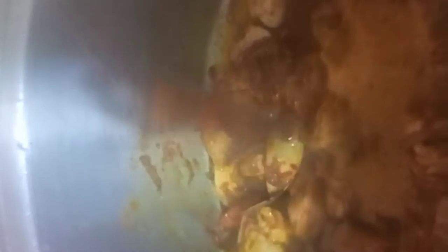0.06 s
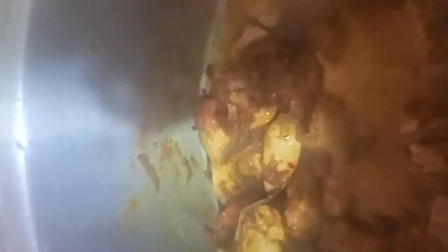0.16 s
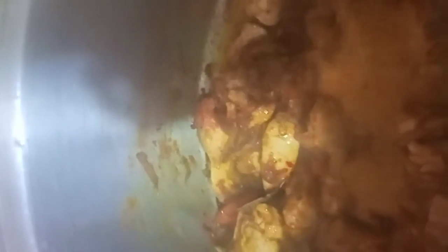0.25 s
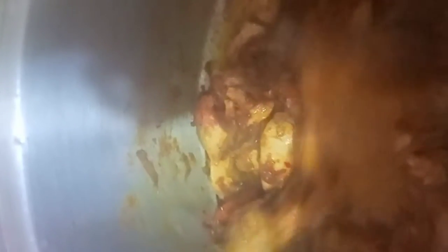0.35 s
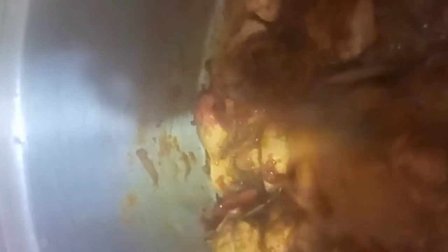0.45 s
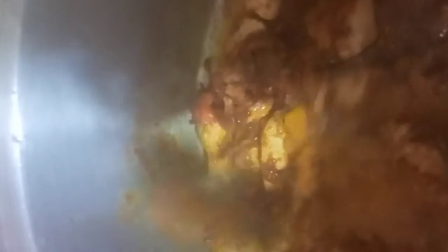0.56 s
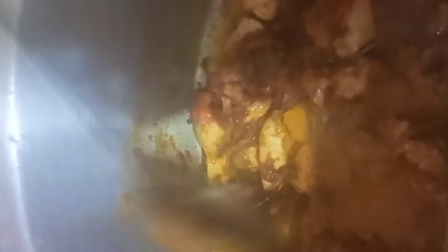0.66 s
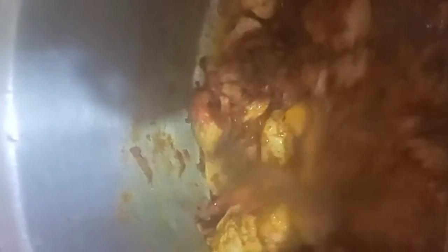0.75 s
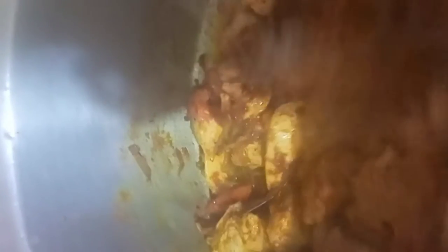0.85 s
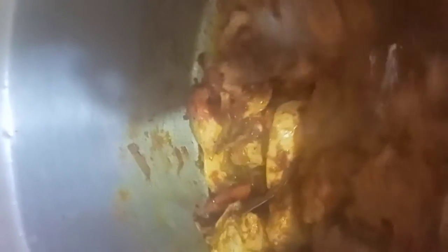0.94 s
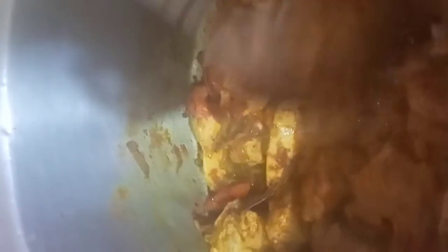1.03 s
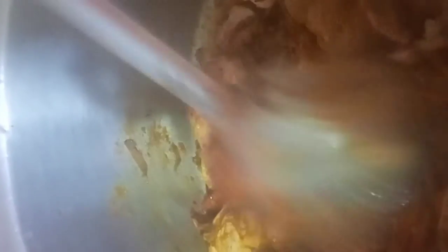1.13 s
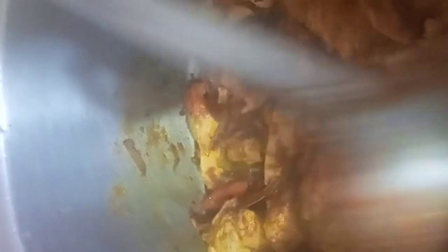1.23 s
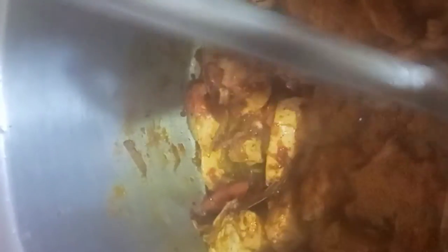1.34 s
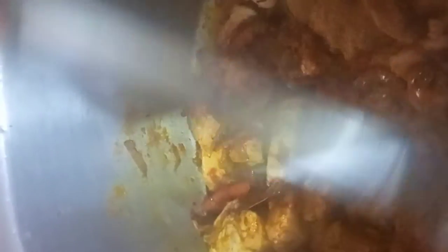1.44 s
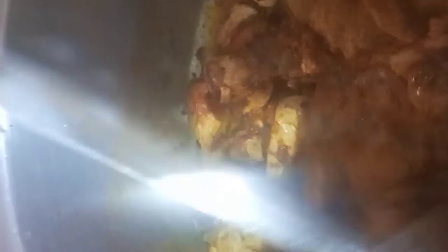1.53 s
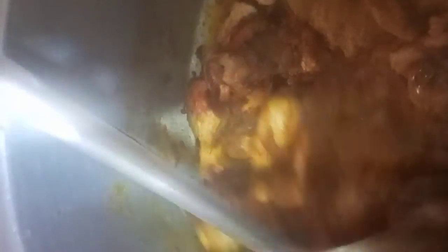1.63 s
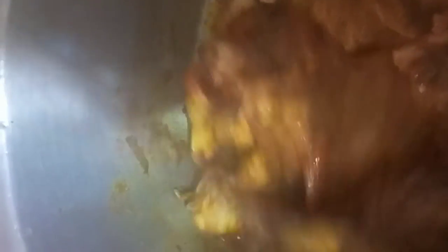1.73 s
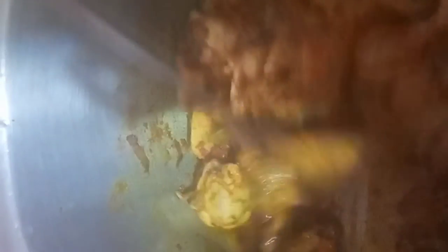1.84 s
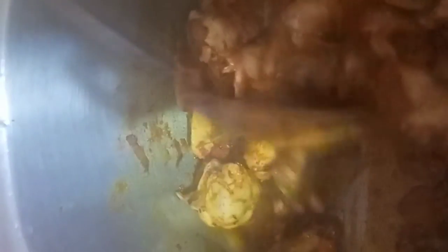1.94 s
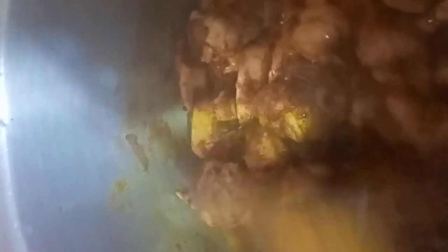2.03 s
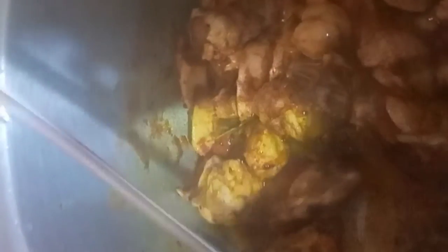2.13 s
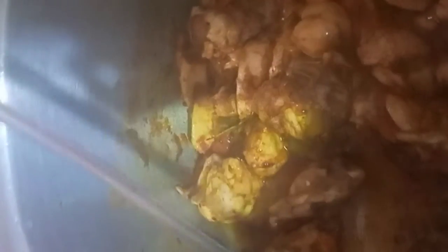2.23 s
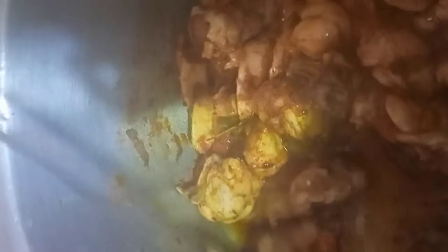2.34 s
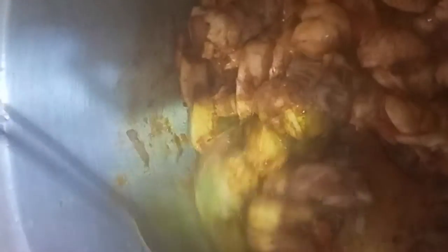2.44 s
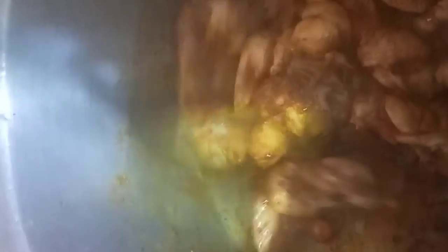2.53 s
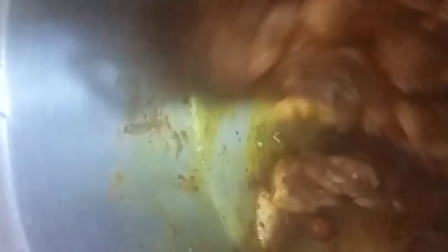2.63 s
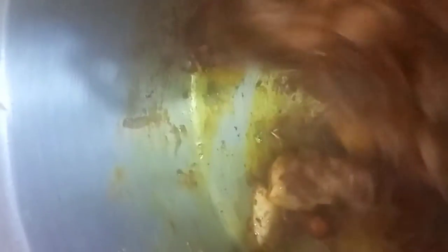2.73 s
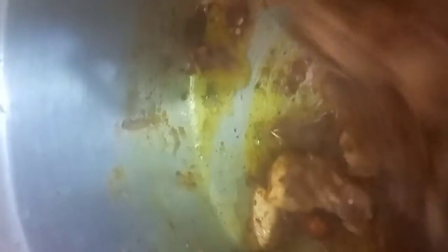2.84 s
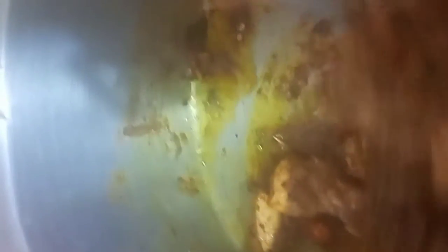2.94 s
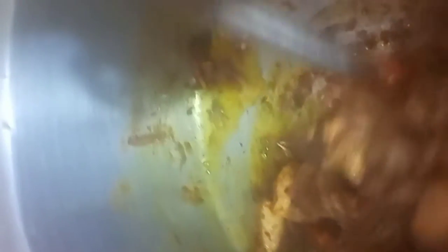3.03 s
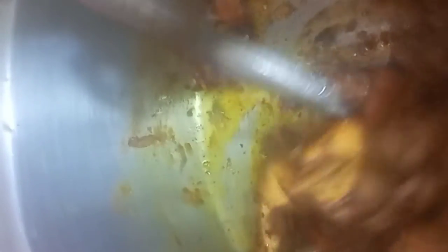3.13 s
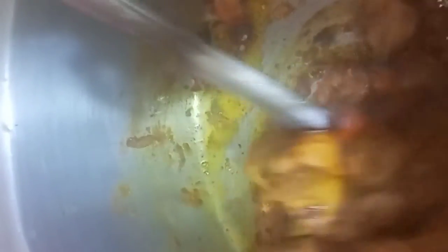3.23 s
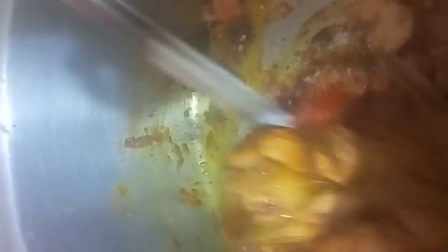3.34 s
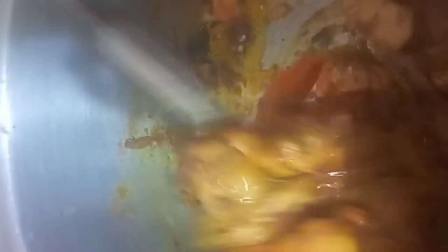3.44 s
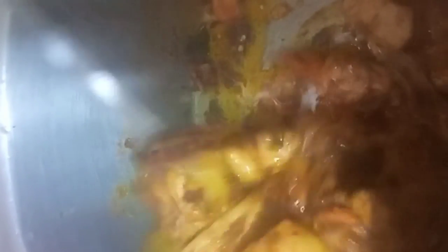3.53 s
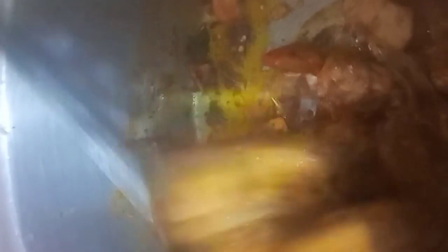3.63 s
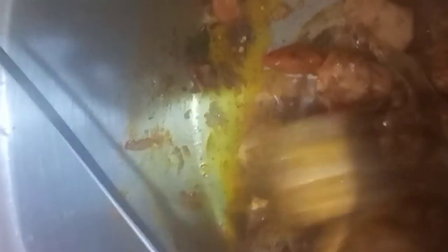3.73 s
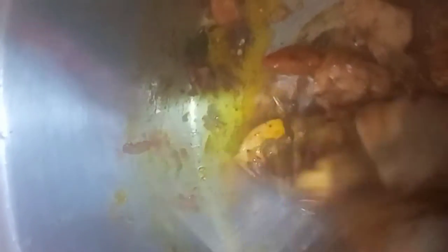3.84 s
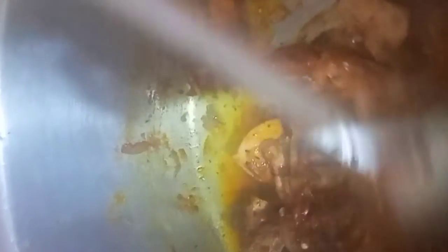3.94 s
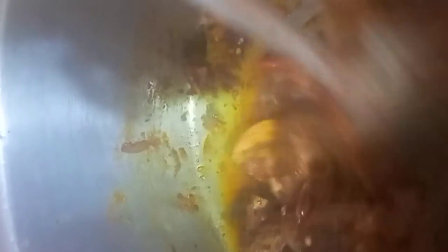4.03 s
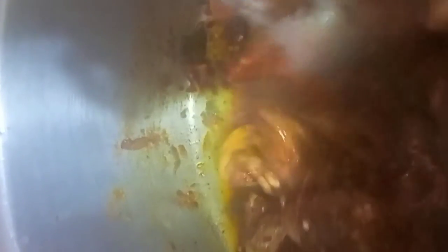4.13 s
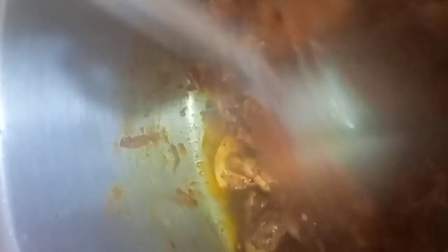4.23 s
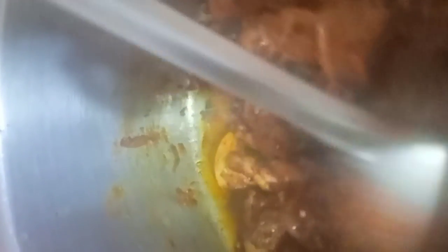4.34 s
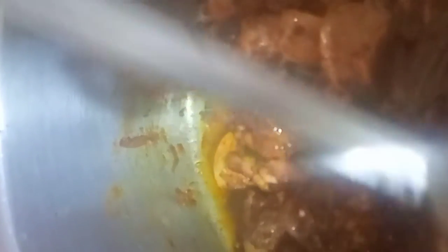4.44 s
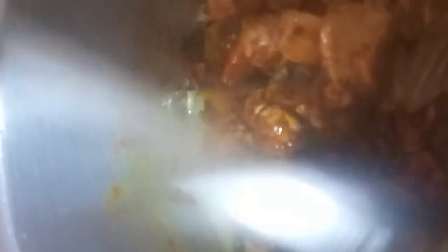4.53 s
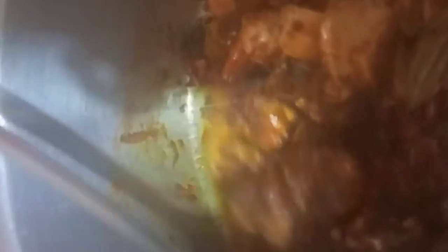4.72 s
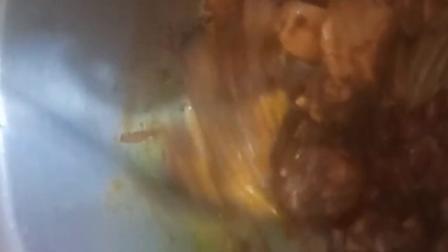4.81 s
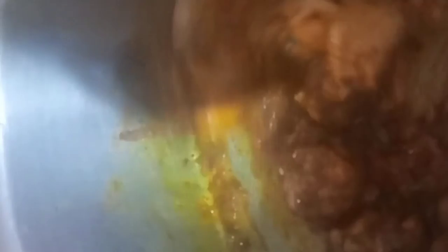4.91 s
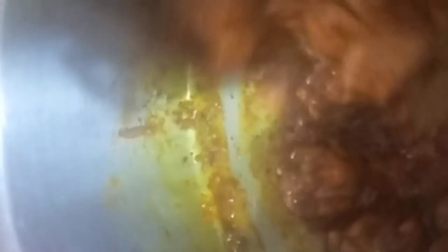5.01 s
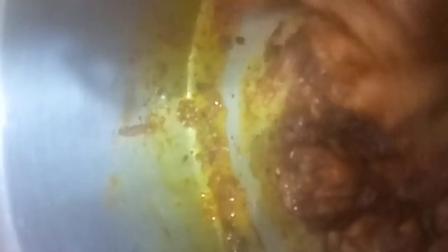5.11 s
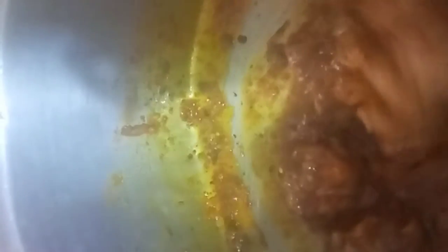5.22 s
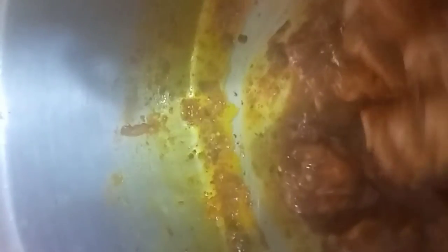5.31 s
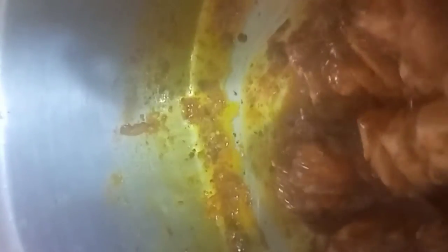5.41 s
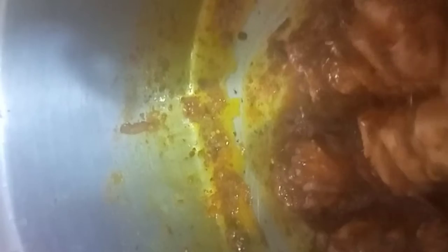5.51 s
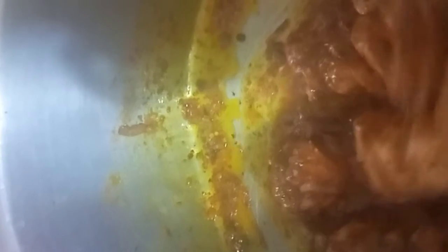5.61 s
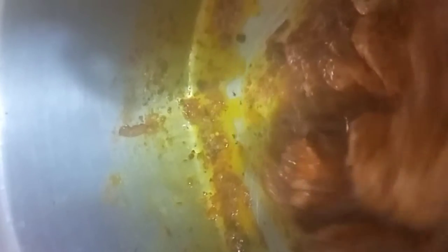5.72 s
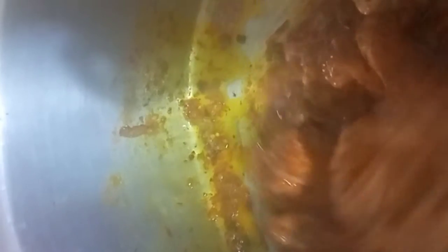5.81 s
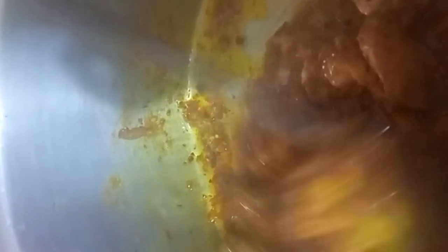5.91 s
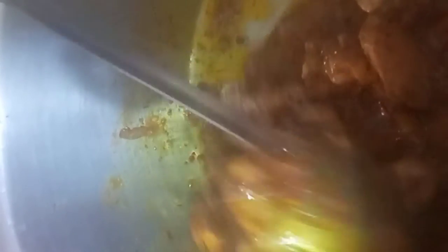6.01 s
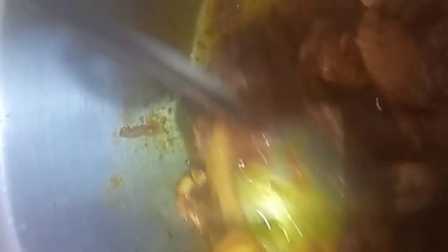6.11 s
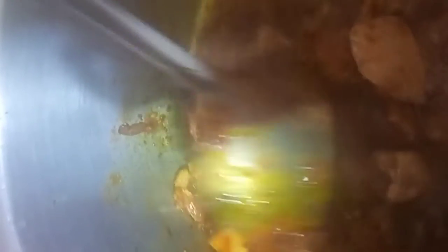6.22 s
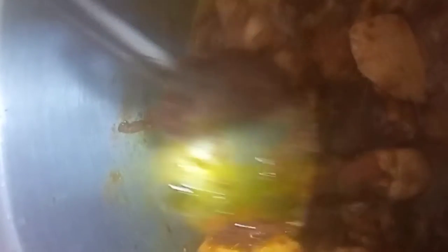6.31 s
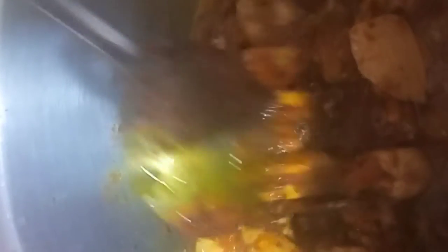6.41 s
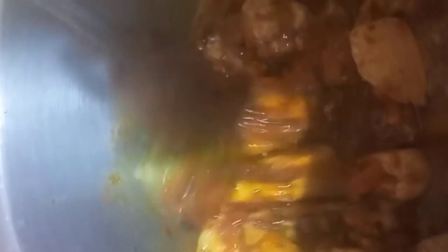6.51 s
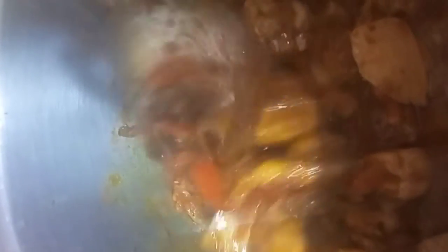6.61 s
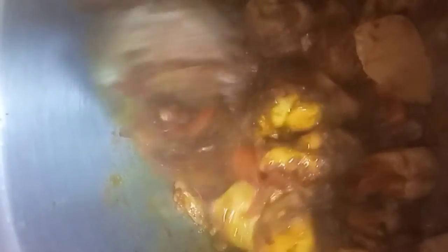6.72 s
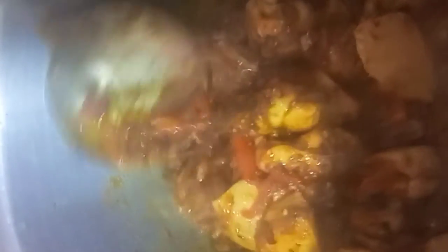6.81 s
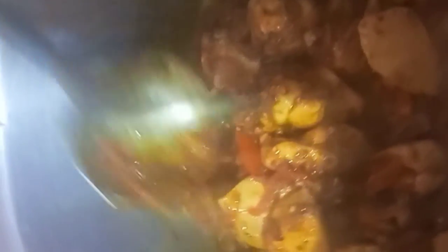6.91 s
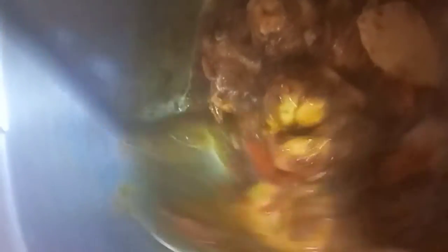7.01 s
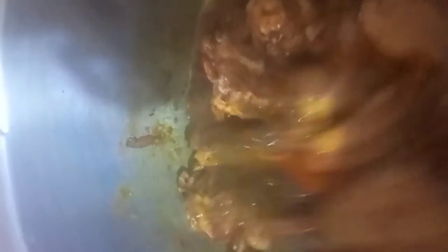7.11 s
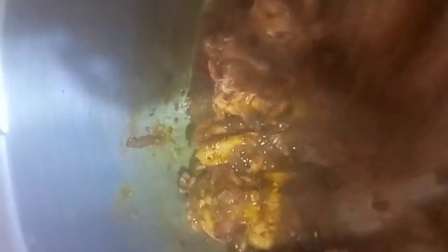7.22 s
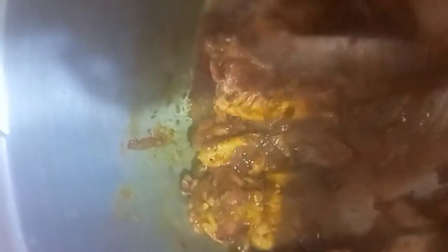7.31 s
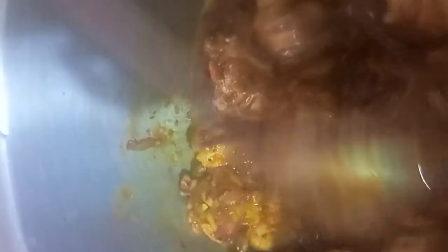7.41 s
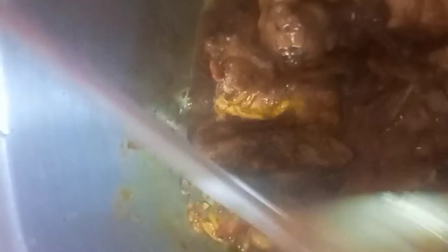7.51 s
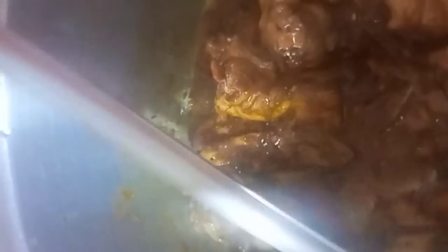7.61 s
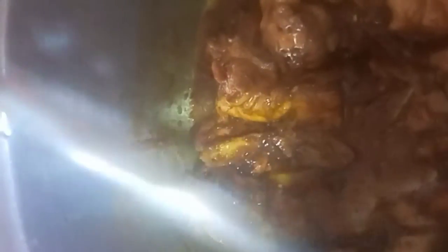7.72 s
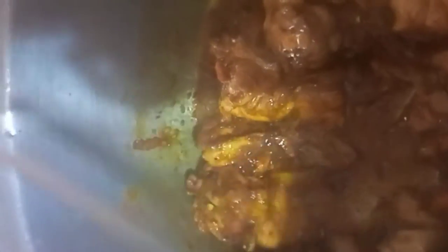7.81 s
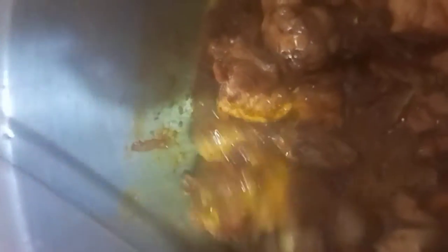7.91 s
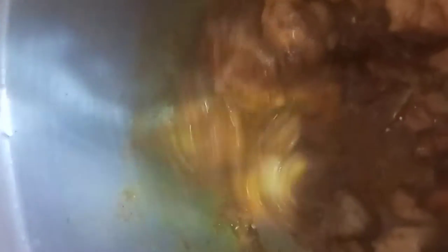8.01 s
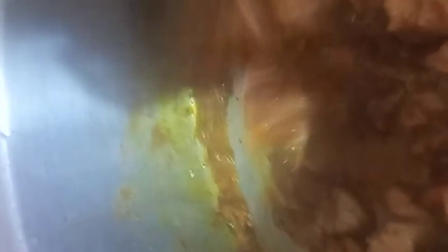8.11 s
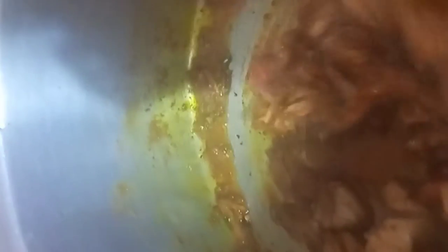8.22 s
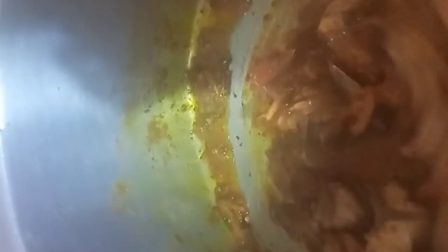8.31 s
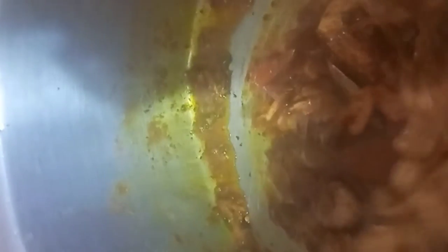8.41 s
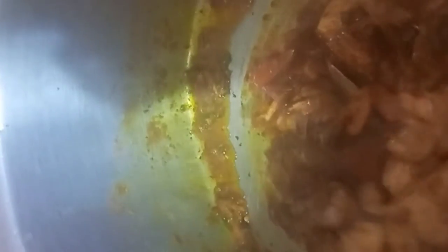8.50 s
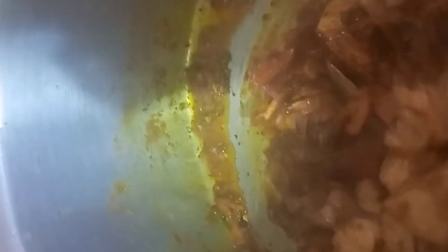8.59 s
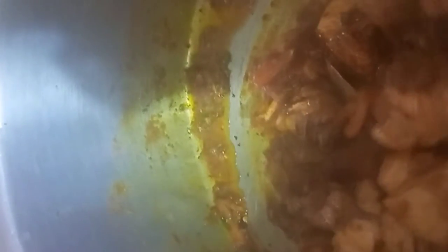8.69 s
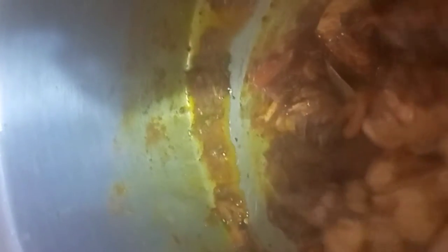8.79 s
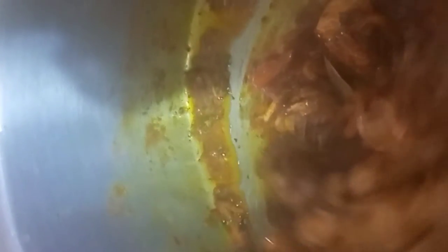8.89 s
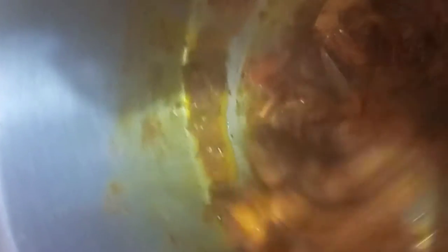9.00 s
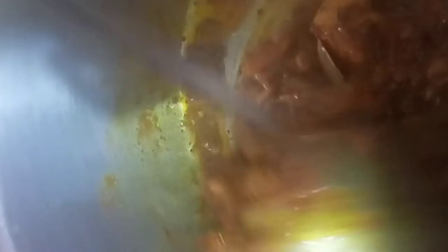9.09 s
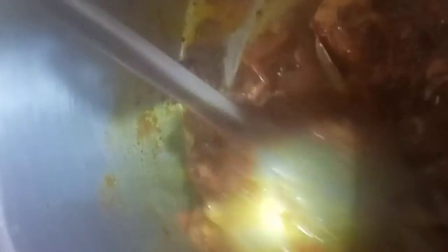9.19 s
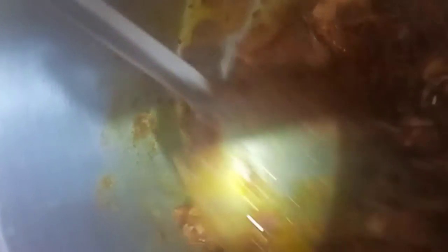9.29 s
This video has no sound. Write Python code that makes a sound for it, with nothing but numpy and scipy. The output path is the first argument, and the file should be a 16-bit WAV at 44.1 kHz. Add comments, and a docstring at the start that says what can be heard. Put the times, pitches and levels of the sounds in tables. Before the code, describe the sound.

Close to a metal pot in a small kitchen, a ladle taps the wall with a short bright clank, then stirs wet chicken in separate bursts: dull thumps, quickly damped clanks, gritty sticking scrapes and soft flops of meat. Sauce swishes between strokes, bubbles pop, and faint sizzling swells and settles. The last vigorous stroke gives way to quiet frying. Mono and dry, with a short room reflection.

```python
"""In a small kitchen, close by, a metal ladle stirs wet chicken in a metal pot.
Knocks are short pushes and rattles that sound the loaded bottom, the ringing wall and a bright edge.
Sticking, slipping strokes are bursts of clicks through resonances; meat shoves and flops, sauce swishes.
Between strokes dense clicks sizzle faintly, single bubbles pop as short rings with a splash of noise,
and filtered noise makes a faint low rumble."""
import sys
import numpy as np
from scipy import signal
from scipy.fft import rfft, irfft
from scipy.io import wavfile
from scipy.ndimage import uniform_filter1d

SR = 44100
rng = np.random.default_rng(int(sys.argv[2]) if len(sys.argv) > 2 else 0)


def master_out(mix):
    """Clip the mix to full scale and print it as 16-bit PCM to the path in sys.argv[1]."""
    frames = np.transpose(np.atleast_2d(mix))
    ceiling = np.clip(frames, -1, 1)
    pcm = np.round(ceiling * 32767).astype(np.int16)
    wavfile.write(sys.argv[1], SR, pcm)


N = 412335

# ladle blows, levels before the trims in knocks(): start_s, thud_db (loaded bottom), jolt_db (whole pot),
# clank_db (wall), edge_db (bright edge), ring_hz (strongest ring), rattle_t60_s
KNOCKS = [(0.2787, -35.5, -37.5, -17, -17.5, 2564, 0.093), (0.915, -30, -44, -24, -30, 1770, 0.022),
          (1.429, -31.5, -48.5, -39, -47, 1770, 0.038), (2.265, -21.5, -35.5, -26, -28, 1710, 0.02),
          (2.397, -27, -57, -57, -37, 1240, 0.06), (2.572, -71, -44, -37, -57, 2310, 0.025),
          (2.816, -58, -53, -33.5, -35, 1815, 0.033), (4.570, -23.5, -49, -26, -33.5, 1620, 0.16),
          (4.69, -67, -70, -36, -38.5, 2000, 0.026), (6.828, -36.5, -60.5, -18.5, -26.5, 1665, 0.025),
          (7.237, -46, -61, -30, -50, 1630, 0.033), (7.814, -20.5, -38, -20.5, -28, 1640, 0.049),
          (7.893, -35, -53, -28, -33, 2107, 0.03), (8.268, -37.5, -50.5, -36, -43, 1840, 0.054)]
# colour of the loaded bottom: freq_hz, relative_db
BOTTOM = [(40, -51.5), (95, -41), (135, -22.5), (205, -5.5), (240, -10.5), (275, -0.5), (335, 1.5),
          (400, -5.5), (470, -12), (570, -26.5), (780, -24), (1100, -42), (1800, -65)]
# colour of the pot rocking on its stand: freq_hz, relative_db
JOLT = [(30, -33.5), (70, -24), (110, -13), (150, 0), (195, 1.5), (240, -10.5), (400, -37), (800, -59)]
# colour of the wall's clank, before the shift by hardness: freq_hz, relative_db
CLANK = [(300, -38), (600, -12.5), (770, -2), (1000, -13), (1200, -0.5), (1400, -9), (1650, 5.5),
         (2100, -7), (2700, -13.5), (3300, -8), (4200, -19), (5500, -27.5), (9000, -58)]
# colour of the ladle's edge contact, also played by scraping(): freq_hz, relative_db
EDGE = [(2800, -42.5), (4300, -12.5), (4900, -7), (5500, -6), (6100, 5.5), (6550, -6), (7200, -10.5),
        (8500, -31.5), (10500, -29), (13000, -35.5), (14200, -25.5), (15200, -18.5), (16000, -20)]


def knocks():
    """Each blow thumps the bottom, jolts the pot and rattles on the wall, whose ring the food soon damps."""
    out = np.zeros(N)
    t = np.arange(SR // 2) / SR
    for start, thud_db, jolt_db, clank_db, edge_db, ring_hz, rattle_t60 in KNOCKS:
        rattle = rng.standard_normal((3, len(t))) * fade(t, rattle_t60) * onset(t, .0015)
        push = signal.unit_impulse(len(t))
        thud = kitchen(colour(push, BOTTOM), wet_db=-6)
        jolt = kitchen(colour(push, JOLT), wet_db=3.5)

        hardness = ring_hz / 1650  # a harder contact shifts the whole clank upward
        body = colour(rattle[0], np.multiply(CLANK, [hardness, 1]))
        strongest = band(ring(ring_hz, t60=.055), ring_hz / 2, ring_hz * 2)
        damped_wall = wall() * np.exp(-t / .045)
        modes = signal.oaconvolve(rattle[2], damped_wall)[:len(t)]
        modes = band(modes, low_hz=650, high_hz=7000)
        clank = unit_attack(body) + amp(-7) * unit_attack(strongest) + amp(-10) * unit_attack(modes)
        clank = kitchen(clank, wet_db=-4.5)
        edge = kitchen(colour(rattle[1], EDGE), wet_db=-8)

        levels_db = (thud_db, jolt_db, clank_db - 6.5, edge_db - 5)
        for part, db in zip((thud, jolt, clank, edge), levels_db):
            add(out, start, amp(db) * unit_attack(part))
    return out


# ringing modes of the pot wall: freq_hz, relative_db, t60_s
WALL = [(780, -14.5, 0.5), (894, -10.5, 0.18), (1160, 0.5, 0.25), (1596, 1, .2), (1655, -2, 0.083),
        (1950, -13, 0.25), (2050, -12.5, 0.9), (2138, -7, 0.16), (2295, -6.5, 0.08), (2564, -3.5, 0.078),
        (2580, -7.5, 0.073), (2960, -13.5, 0.1), (3920, -10.5, 0.36), (4380, -3, .19), (4760, -12, 0.38),
        (5500, -7, 0.23), (5717, -15, .19), (6110, -1.5, 0.098), (6170, -9.5, 0.26), (7100, -14, .22)]


def wall():
    """The wall's modes; their signs depend on the place of contact, drawn at random."""
    return sum(rng.choice([-1, 1]) * amp(db) * ring(hz, t60) for hz, db, t60 in WALL)


# colour of the ladle grinding on the wall: freq_hz, relative_db
GRIND = [(300, -41.5), (560, -18.5), (800, 1.5), (1000, -33), (1200, 8), (1420, -8.5), (1800, 11.5),
         (2150, -3.5), (2500, 6), (3000, -4.5), (3500, 1), (4200, -26), (5500, -16.5), (9000, -45)]
# colour of food dragged over the bottom, also played by flops(): freq_hz, relative_db
DRAG = [(50, -40.5), (110, -24), (170, -19.5), (230, -3), (275, -4.5), (335, 4.5), (410, -6), (490, -21.5),
        (600, -20), (900, -64)]


def scraping():
    """Stick and slip: bursts of tiny clicks drive wall, bottom and edge, and squeeze bubbles from the sauce."""
    friction, drag, edge, pitch = ladle_contact()
    judder = unit(amp(3 * wander(rate_hz=110)))
    slips = patchy(clicks(per_s=1800, spread_db=3) * judder, depth_db=3.5)

    rasp = unit(resonate(slips, pitch, width_hz=690))
    squelch = bubbles(per_s=320, low_hz=800.6, high_hz=4210, cycles=9.1, spread_db=4.0)
    wet = friction * (amp(-5.5) * rasp + amp(-13.5) * squelch)
    wet = band(wet, low_hz=666, high_hz=4600)
    modes = wall()
    ringing = signal.oaconvolve(slips * friction, modes / np.linalg.norm(modes))[:N]
    ringing = band(ringing, low_hz=606, high_hz=7160)
    grind = amp(-6) * colour(slips * friction, GRIND) + wet + amp(-18.0) * ringing

    chirps = bubbles(per_s=250, low_hz=5700, high_hz=6600, cycles=14, spread_db=4)
    chirps = band(chirps * edge, low_hz=4470, high_hz=7240)
    squeak = amp(-6) * colour(slips * edge, EDGE) + amp(-10) * chirps
    # pieces of meat bump along the bottom
    tumbling = patchy(clicks(per_s=420, spread_db=1.5), depth_db=5.0)
    return kitchen(grind + squeak + amp(-7) * colour(tumbling * drag, DRAG), wet_db=-9)


# ladle strokes along the wall: start_s, length_s, friction_db, edge_db, gain_db (force, start to end)
STROKES = [(1.475, 0.13, -55, -59.5, -24), (2.369, 0.097, -35.5, -37.5, 21.5),
           (2.544, 0.021, -33.5, -28, 1), (2.622, 0.11, -41, -45.5, -12.5), (2.77, .12, -41.5, -43.5, -1),
           (2.927, .025, -42, -49, -2.5), (2.972, 0.073, -55.5, -48, -5.5), (4.585, 0.047, -29, -30, -4),
           (4.702, 0.044, -47, -41.5, 6), (4.85, 0.17, -35, -35.5, -4.5), (5.115, 0.056, -28.5, -29, -14.5),
           (5.206, 0.13, -47.5, -49.5, -8), (5.389, 0.016, -52, -50, 1.5), (7.85, 0.069, -39.5, -43, -2.5),
           (7.977, 0.13, -36.5, -34, 10), (8.099, 0.13, -28, -25, 6.5), (8.236, .05, -43, -47, -11),
           (8.313, 0.11, -40, -42.5, -10)]
# the heap of chicken pushed across the bottom: start_s, length_s, drag_db
SHOVES = [(0.961, 0.03, -39), (1.466, 0.11, -65), (2.396, 0.24, -42), (2.768, 0.09, -41),
          (2.844, 0.1, -29.5), (4.607, 0.33, -40), (4.86, 0.46, -38), (5.28, 0.17, -59),
          (7.747, .03, -41.5), (7.872, 0.52, -35.5), (8.283, 0.122, -42.5)]
# short skids of the ladle, levels before SKID_DB: start_s, friction_db, drag_db, edge_db, pitch_hz, length_s
SKIDS = [(0.977, -31, -51, -38, 1800, 0.017), (1.311, -22, -42, -22.5, 2010, 0.021),
         (1.679, -35.5, -76, -49, 1720, 0.017), (2.81, -40.5, -29, -38, 1900, 0.015),
         (3.704, -45.5, -56, -35.5, 1920, 0.031), (3.779, -33.5, -35.5, -37, 1890, 0.029),
         (3.915, -40.5, -39.5, -46, 1620, 0.035), (4.425, -59.5, -76, -49, 2500, 0.066),
         (4.684, -20, -45, -24, 2004, 0.012), (7.232, -24, -54, -21, 1570, 0.032),
         (7.251, -29.5, -56, -22, 1700, 0.0081), (7.668, -40, -43, -36, 2400, 0.029),
         (7.708, -23, -36, -24, 1800, 0.029), (7.969, -25, -31, -19.5, 1900, 0.026),
         (8.03, -15, -39, -16, 2160, 0.009)]
# pressing harder raises the pitch of a stroke's scrape
SCRAPE_HZ, LIGHT_TOUCH_DB, SCRAPE_HZ_PER_DB = 1700, -45.5, 28.5
SHOVE_GAIN_DB = -1.5  # from start to end, as the heap spreads out
SKID_BITE_S, SKID_DB = 0.0087, -5


def ladle_contact():
    """How hard the ladle rubs the wall, drags food and digs in its edge, and the pitch of the scrape."""
    friction, drag, edge, pitch = np.zeros((4, N))
    for start, length, friction_db, edge_db, gain_db in STROKES:
        force = stroke(length, gain_db)
        rub = amp(friction_db) * force
        pressure_db = np.maximum(20 * np.log10(rub + 1e-12) - LIGHT_TOUCH_DB, 0)
        add(friction, start, rub)
        add(edge, start, amp(edge_db) * force)
        add(pitch, start, rub * (SCRAPE_HZ + SCRAPE_HZ_PER_DB * pressure_db))
    for start, length, db in SHOVES:
        add(drag, start, amp(db) * stroke(length, SHOVE_GAIN_DB))
    t = np.arange(SR // 4) / SR
    for start, *levels_db, hz, length in SKIDS:
        # bites quickly, then lets go
        skid = amp(SKID_DB) * onset(t, SKID_BITE_S) * np.exp(-(t / length) ** 2)
        for track, db in zip((friction, drag, edge), levels_db):
            add(track, start, amp(db) * skid)
        add(pitch, start, amp(levels_db[0]) * skid * hz)
    # mean pitch weighted by friction, so the stronger contact dominates
    return friction, drag, edge, pitch / (friction + 1e-12)


BITE_S, RELEASE_T60_S = .011, 0.11  # every stroke grips quickly and dies away when the ladle lifts


def stroke(length, gain_db):
    """Force of one push: it grips, grows or slackens steadily, and is released."""
    t = np.arange(int((length + .3) * SR)) / SR
    held_db = gain_db * (np.minimum(t / length, 1) - .5)
    release = fade(np.maximum(t - length, 0), RELEASE_T60_S)
    return onset(t, BITE_S) * amp(held_db) * release


# single pieces tumble off the heap and land: start_s, level_db
FLOPS = [(2.525, -42.5), (2.588, -45), (2.93, -38.5), (4.94, -39), (5.077, -50), (5.23, -41.5), (7.97, -36),
         (8.186, -38.5), (8.35, -45.5), (8.82, -70), (9.06, -74)]


def flops():
    """A piece of meat lands with a soft bump on the loaded bottom."""
    out = np.zeros(N)
    for start, db in FLOPS:
        bump = kitchen(colour(signal.unit_impulse(SR // 2), DRAG), wet_db=-5.5)
        add(out, start, amp(db) * unit_attack(bump))
    return out


# the ladle's back slides through sauce: middle_s, level_db, centre_hz (geometric), width_hz,
# half_length_s (from the middle to 1/e)
SLIDES = [(.505, -51.5, 6000, 2370, .04), (0.623, -42, 3020, 3670, 0.069), (0.69, -49, 1840, 1170, 0.066),
          (1.564, -43.5, 6000, 880, 0.015), (1.7, -37.5, 6220, 1150, 0.009), (3.083, -45, 1820, 580, 0.044),
          (3.064, -57, 6380, 700, 0.22), (5.83, -74.5, 2800, 3040, 0.19), (6.97, -64, 2750, 3500, 0.095),
          (7.156, -59, 1780, 2320, 0.16), (7.304, -58, 1790, 2000, 0.036), (8.206, -35, 3280, 2630, 0.051)]


def slides():
    """Light, well-wetted contact gives a soft swish that swells and fades."""
    out = np.zeros(N)
    t = np.arange(N) / SR
    # the film of sauce tears in tiny bursts
    film = patchy(clicks(per_s=3300, spread_db=-2.0), depth_db=2.5)
    for middle, db, hz, width_hz, half_length in SLIDES:
        low_hz = np.hypot(hz, width_hz / 2) - width_hz / 2
        swish = unit(band(film, low_hz, low_hz + width_hz))
        out += amp(db) * swish * np.exp(-((t - middle) / half_length) ** 2)
    return kitchen(out, wet_db=-12.0)


# bursting bubbles and spits of fat: start_s, peak_db (before the kitchen), pitch_hz, t60_s
POPS = [(1.506, -32.5, 5870, 0.035), (3.341, -42.5, 6520, 0.018), (4.206, -63, 3230, 0.11),
        (5.077, -31, 6050, 0.0093), (5.35, -33, 6010, 0.02), (5.35, -44, 5050, 0.017),
        (6.166, -40.5, 6040, 0.075), (6.359, -53, 3450, 0.024), (6.413, -32, 6040, 0.03),
        (6.947, -51.5, 7680, 0.012), (6.959, -37.5, 3550, 0.0085), (7.004, -50, 6700, .02),
        (7.01, -47.5, 3320, 0.016), (7.032, -26.5, 6180, 0.011), (7.11, -41, 770, 0.049),
        (7.115, -42.5, 1680, 0.019), (7.134, -48, 3660, 0.017), (7.156, -33.5, 2410, 0.0096),
        (7.201, -47.5, 6250, 0.036), (7.223, -36, 1700, 0.029), (7.409, -54.5, 3580, 0.037),
        (7.508, -48.5, 6450, 0.04), (7.901, -15.5, 5850, 0.0088), (7.918, -19.5, 6070, 0.0088),
        (8.546, -41.5, 2500, 0.038), (8.669, -56, 5570, .03), (8.796, -53, 6020, 0.033),
        (9.065, -42.5, 1460, 0.033), (9.32, -57, 2190, 0.029)]


def pops():
    """A bubble bursts with a narrow splash and a short, softly starting ring."""
    out = np.zeros(N)
    t = np.arange(SR // 2) / SR
    for start, db, hz, t60 in POPS:
        bubble = ring(hz, t60) * onset(t, .0012)
        burst = rng.standard_normal(len(t)) * fade(t, t60)
        reach_hz = 400 + hz / 15
        pop = band(unit(bubble) + amp(4) * unit(burst), hz - reach_hz, hz + reach_hz)
        add(out, start, amp(db) * pop / abs(pop).max())
    return kitchen(out, wet_db=-12.0)


# colour of the frying in the hollow of the pot: freq_hz, relative_db
SIZZLE = [(150, -22.5), (330, -9.5), (560, -18), (780, -13.5), (1050, -16.5), (1400, -10.5), (1800, 6),
          (2050, -2), (2400, -10.5), (3400, -13), (4200, -18), (5500, -18.5), (9000, -48)]
# colour of the fine spray and crackle: freq_hz, relative_db
SPRAY = [(3000, -41.5), (4600, -12), (5500, -7.5), (6100, 6), (6600, -4), (7200, -10.5), (8500, -31.5),
         (10500, -37), (13000, -31.5), (14200, -29.5), (15200, -16), (16000, -15)]


def sizzle():
    """Thousands of tiny bursts a second in the pot's hollow, with sparse bubbles and fine crackles."""
    fry, spray = frying_levels()
    body = colour(fry * patchy(clicks(per_s=5300, spread_db=3.5), depth_db=4.0), SIZZLE)
    fizz = colour(spray * patchy(clicks(per_s=4900, spread_db=1.5), depth_db=6.0), SPRAY)
    simmer = bubbles(per_s=67, low_hz=656, high_hz=4200, cycles=11, spread_db=3.5)
    simmer = amp(-11.5) * fry * band(simmer, low_hz=550, high_hz=5000)
    crackle = amp(-77) * colour(clicks(per_s=30, spread_db=8.5), SPRAY)
    lowest_hz, _, lowest_t60 = WALL[0]  # large bubbles ring the lowest wall mode
    tings = signal.oaconvolve(clicks(per_s=8.7, spread_db=3.5), ring(lowest_hz, lowest_t60))[:N]
    tings = amp(-18) * fry * unit(tings)
    mix = amp(2.5) * body + amp(0.5) * fizz + simmer + crackle + tings
    return kitchen(mix, wet_db=-12) * amp(.8 * wander(rate_hz=12))


# stirring brings wet food onto hot metal and the frying flares up, levels before the mix in sizzle():
# peak_s, sizzle_db, spray_db, settle_db_per_s
FLARES = [(0.0, -68, -61.5, 2.5), (.75, -57.5, -60, 15), (1.7, -61.5, -53.5, 20), (3.1, -61, -59.5, 24),
          (4.05, -72.5, -73, 4), (5.4, -68, -68.5, 14), (5.9, -66.5, -66, 29.5), (7.31, -62.5, -58, 65),
          (8.5, -70, -73.5, 10)]
FLARE_RISE_DB_PER_S = 55
CALM_SIZZLE_DB, CALM_SPRAY_DB = -86, -81.5  # the frying left alone, also before the mix


def frying_levels():
    """Strength of sizzle and fine spray: each flare builds up, then settles as the metal dries."""
    t = np.arange(N) / SR
    fry, spray = amp(CALM_SIZZLE_DB), amp(CALM_SPRAY_DB)
    for peak, fry_db, spray_db, settle_db_per_s in FLARES:
        flare = amp(np.minimum(FLARE_RISE_DB_PER_S * (t - peak), settle_db_per_s * (peak - t)))
        fry = np.hypot(fry, amp(fry_db) * flare)
        spray = np.hypot(spray, amp(spray_db) * flare)
    return fry, spray


# course of the low rumble, before the 3.5 dB lift in rumble(): time_s, level_db
RUMBLE = [(0, -88), (.7, -71), (1.8, -90.5), (2.3, -71), (3.501, -79), (5.7, -78), (6.6, -82.5),
          (7.3, -83.5), (9.35, -81)]
# colour of the low rumble: freq_hz, relative_db
LOW = [(20, -28), (50, -23.5), (75, -6.5), (100, 3.5), (135, -7.5), (200, -7.5), (350, -10), (700, -35.5)]


def rumble():
    """A faint low rumble, filtered noise that comes and goes."""
    level_db = np.interp(np.arange(N) / SR, *np.transpose(RUMBLE))
    return amp(level_db + 3.5) * colour(rng.standard_normal(N), LOW)


# decay of pot and kitchen: freq_hz, t60_s
KITCHEN = [(150, 0.34), (400, 0.32), (1040, 0.31), (2760, 0.18), (7280, 0.27), (15000, 0.21)]


def kitchen(x, wet_db):
    """Direct sound plus dense reflections from pot and room, with a decay time for each pitch region."""
    hz, t, z = signal.stft(rng.standard_normal(SR // 2), SR, nperseg=256)
    tail = signal.istft(z * fade(t, read(KITCHEN, hz)[:, None]), SR, nperseg=256)[1]
    tail[:130] = 0  # the reflections start about 3 ms after the direct sound
    wet = signal.oaconvolve(x, tail / np.linalg.norm(tail))[:len(x)]
    return (x + amp(wet_db) * wet) / np.hypot(1, amp(wet_db))


def clicks(per_s, spread_db):
    """Random clicks of rms 1 and either sign, their sizes spread in dB."""
    size = amp(spread_db * np.minimum(rng.exponential(1, N), 4))
    return unit(size * rng.choice([-1, 1], N) * (rng.random(N) < per_s / SR))


def bubbles(per_s, low_hz, high_hz, cycles, spread_db, count=40):
    """Wet grains: small pockets of sauce, each ringing for a few cycles with a slightly rising pitch."""
    out = np.zeros(N)
    grains_per_pitch = int(per_s * N / SR / count) + 1
    for hz in np.geomspace(low_hz, high_hz, count):
        age = np.arange(int(6 * cycles * SR / hz)) * hz / SR / cycles  # 1 when faded to 1/e
        grain = np.sin(2 * np.pi * cycles * age * (1 + 0.013 * age)) * np.exp(-age) * onset(age, .3)
        for place, size, sign in rng.random((2000, 3))[:grains_per_pitch]:
            gain = amp(-spread_db * np.log(size + 0.014))
            add(out, place * N / SR, np.sign(sign - .5) * gain * grain)
    return unit(out)


def patchy(x, depth_db):
    """As the contact moves, different resonances swell and fade for a few hundredths of a second."""
    z = signal.stft(x, nperseg=512, noverlap=384)[2]
    patches = rng.standard_normal(z.shape)
    for _ in range(2):
        patches = uniform_filter1d(patches, size=3, axis=0)  # across pitch
        patches = uniform_filter1d(patches, size=10, axis=1)  # along time
    z = z * amp(depth_db * unit(patches))
    return unit(signal.istft(z, nperseg=512, noverlap=384)[1][:N])


def resonate(x, hz, width_hz):
    """A resonance of gain 1 that follows the curve hz: shift it to zero, low-pass, shift back."""
    turn = np.exp(2j * np.pi * np.cumsum(hz * np.ones(len(x))) / SR)
    r = np.exp(-np.pi * width_hz / SR)
    return 2 * (turn * signal.lfilter([(1 - r) ** 2], [1, -2 * r, r * r], x / turn)).real


def ring(hz, t60):
    """One dying mode, half a second long."""
    t = np.arange(SR // 2) / SR
    return np.sin(2 * np.pi * hz * t) * fade(t, t60)


def fade(t, t60):
    """Exponential decay by 60 dB in t60."""
    return np.exp(-np.log(1000) * t / t60)


def onset(t, rise):
    """Soft start that approaches 1 with the given time constant."""
    return 1 - np.exp(-t / rise)


def wander(rate_hz):
    """A smooth random curve of rms 1, its variation rolling off around the given rate."""
    hz = np.fft.rfftfreq(N, 1 / SR)
    return unit(irfft(rfft(rng.standard_normal(N)) * np.exp(-(hz / rate_hz) ** 2), N))


def colour(x, spectrum, size=4096):
    """Causal minimum-phase filter with the given spectrum; white noise keeps its power."""
    log_gain = np.log(amp(read(spectrum, abs(np.fft.fftfreq(size, 1 / SR)))))
    response = np.fft.ifft(np.exp(np.conj(signal.hilbert(log_gain)))).real
    return signal.oaconvolve(x, response / np.linalg.norm(response))[:len(x)]


def band(x, low_hz, high_hz):
    """Keeps one band, with steep sides."""
    edges = np.clip([low_hz, high_hz], 20, SR / 2 - 100)
    return signal.sosfilt(signal.butter(3, edges, "bandpass", fs=SR, output="sos"), x)


def read(points, hz):
    """Reads a curve between its points on a log frequency axis."""
    f, value = np.transpose(points)
    return np.interp(np.log(hz + 1), np.log(f + 1), value)


def amp(db):
    """Decibels to amplitude."""
    return 10 ** (np.asarray(db) / 20)


def unit(x):
    """Scales to rms 1."""
    return x / np.sqrt(np.mean(x ** 2) + 1e-20)


def unit_attack(x):
    """Scales a blow so that its first 30 ms have rms 1."""
    return x / np.sqrt(np.mean(x[:1323] ** 2))


def add(mix, start, sound):
    """Mixes a sound in at start seconds, cut off at the end of the mix."""
    part = mix[max(round(start * SR), 0):][:len(sound)]
    part += sound[:len(part)]


def scene():
    """All layers, from the ladle to the rumble, in one channel."""
    return (knocks() + scraping() + flops() + slides() + pops() + sizzle() + rumble())[None]


CUT_HZ = 16050


def record(dry):
    """Steep low-pass that removes the treble above CUT_HZ."""
    lowpass = signal.firwin(301, CUT_HZ, window=("kaiser", 8), fs=SR)
    return signal.oaconvolve(dry, lowpass[None], "same")


dry = scene()
out = record(dry)
master_out(out)
```